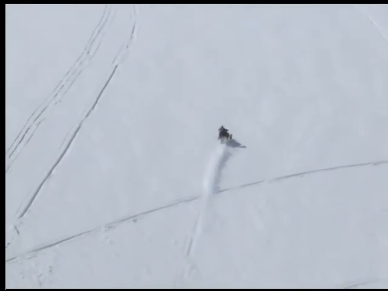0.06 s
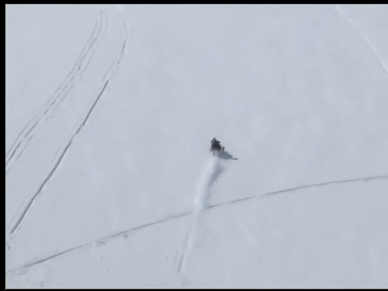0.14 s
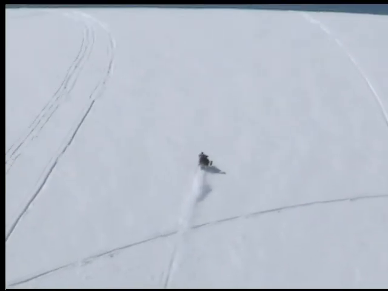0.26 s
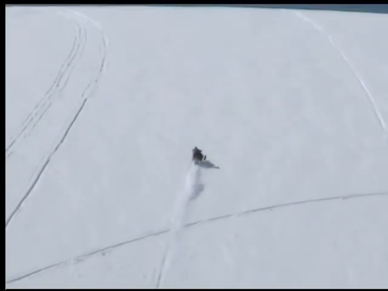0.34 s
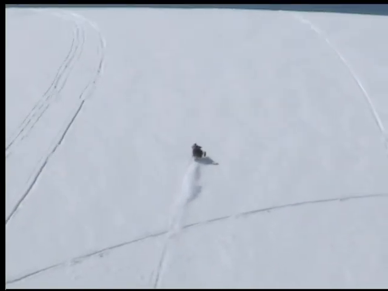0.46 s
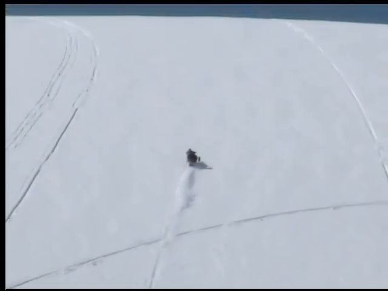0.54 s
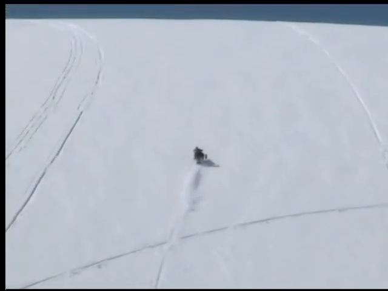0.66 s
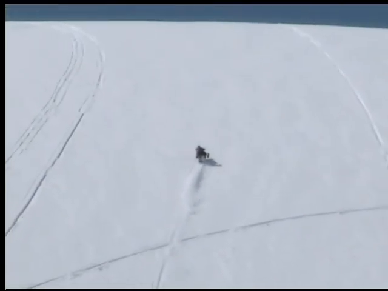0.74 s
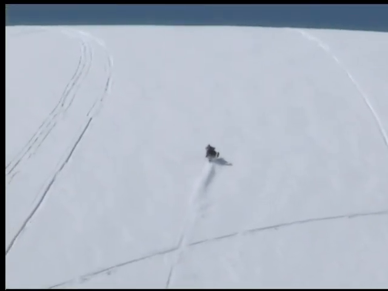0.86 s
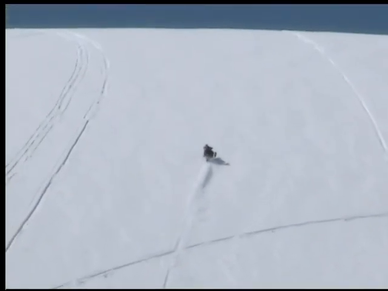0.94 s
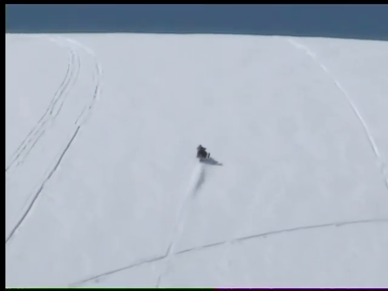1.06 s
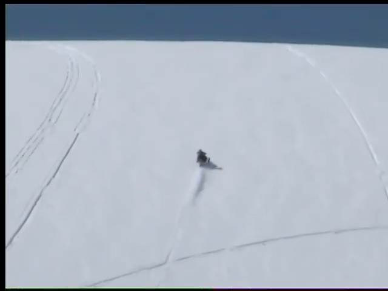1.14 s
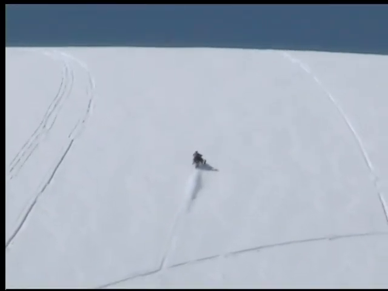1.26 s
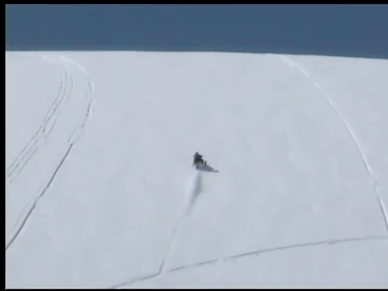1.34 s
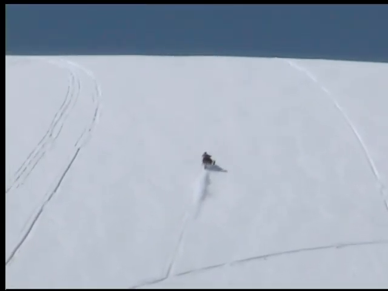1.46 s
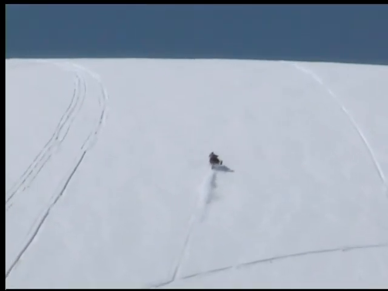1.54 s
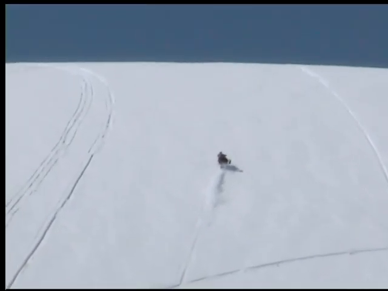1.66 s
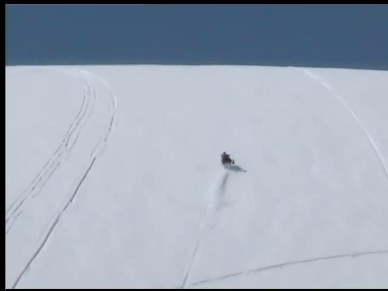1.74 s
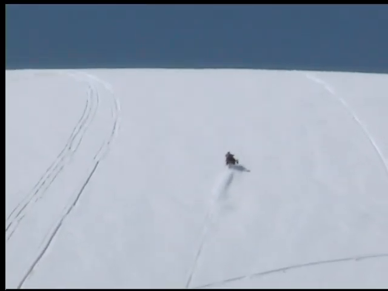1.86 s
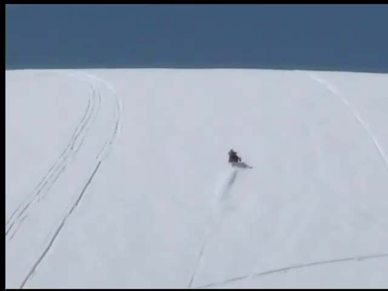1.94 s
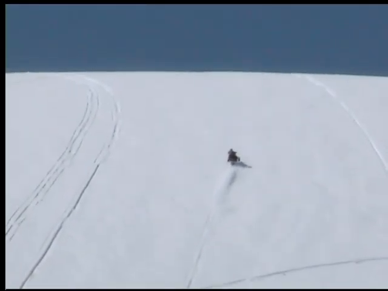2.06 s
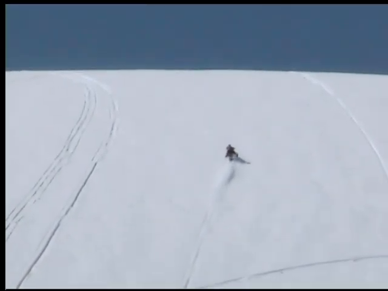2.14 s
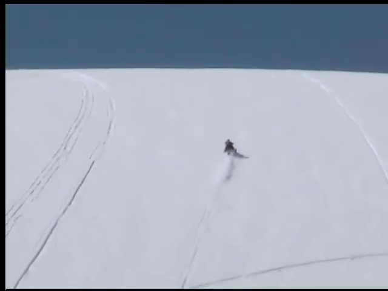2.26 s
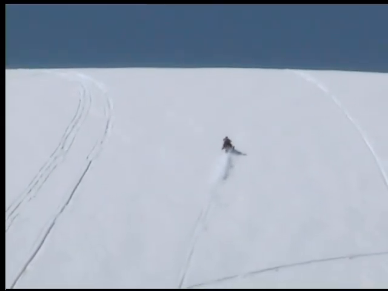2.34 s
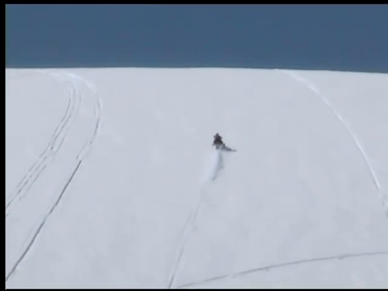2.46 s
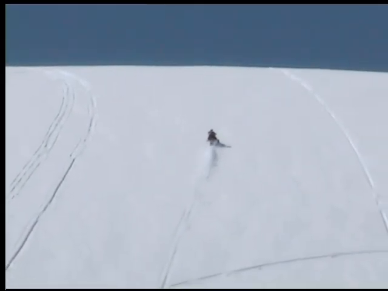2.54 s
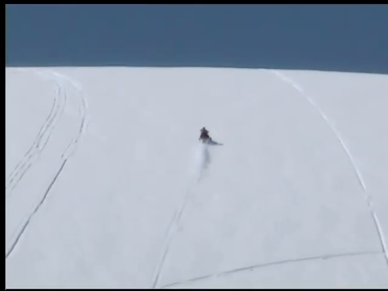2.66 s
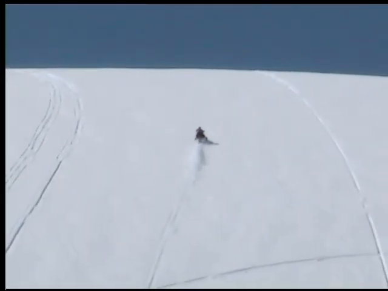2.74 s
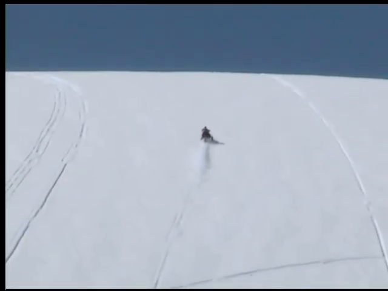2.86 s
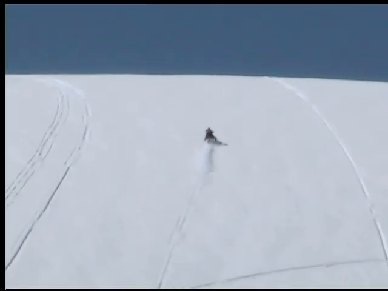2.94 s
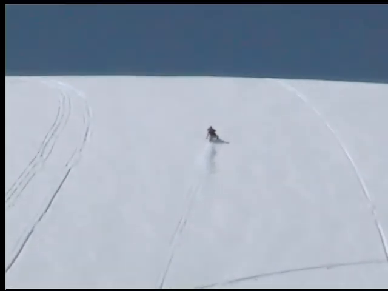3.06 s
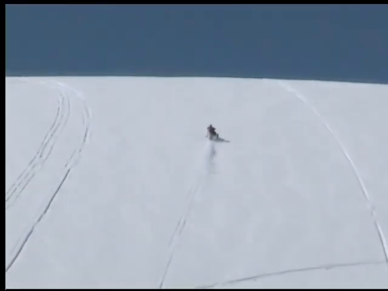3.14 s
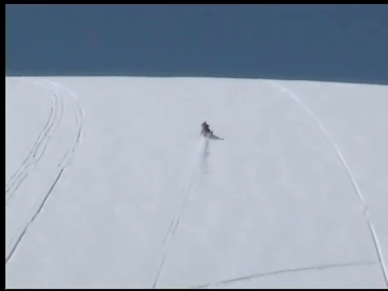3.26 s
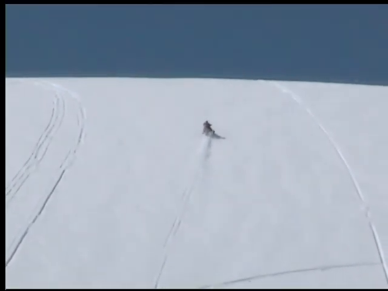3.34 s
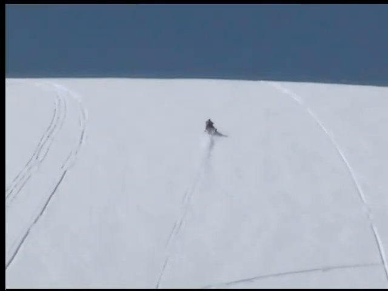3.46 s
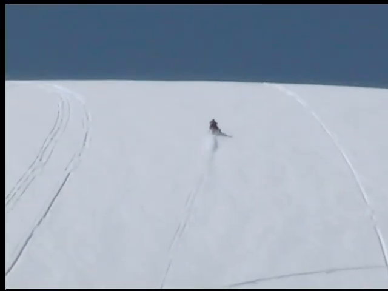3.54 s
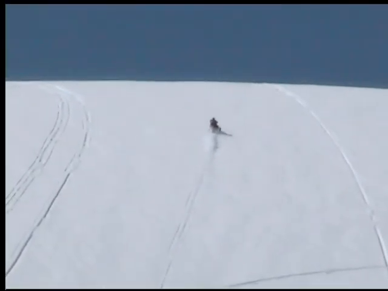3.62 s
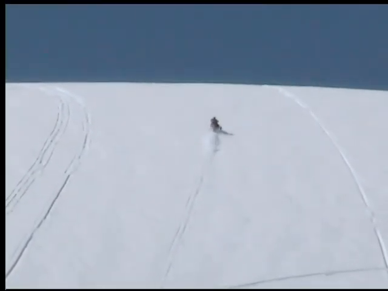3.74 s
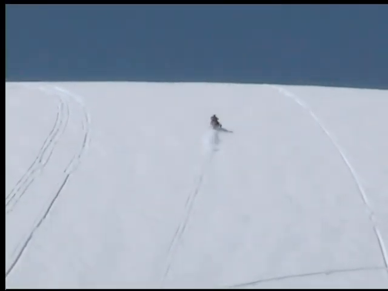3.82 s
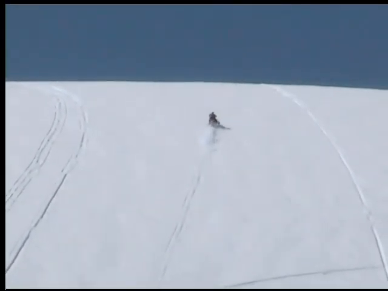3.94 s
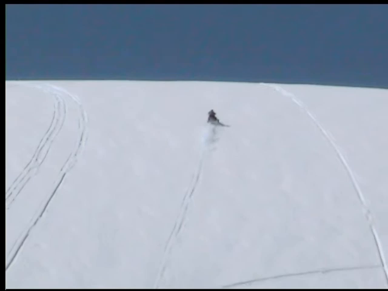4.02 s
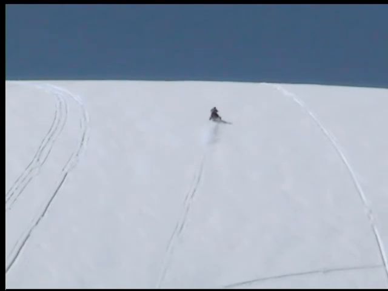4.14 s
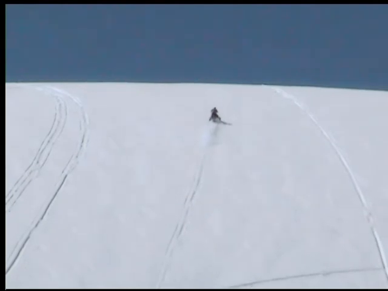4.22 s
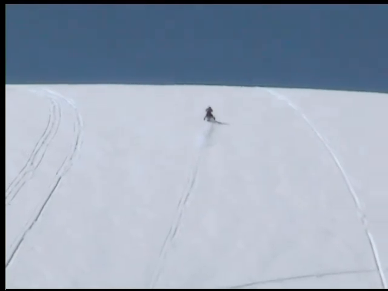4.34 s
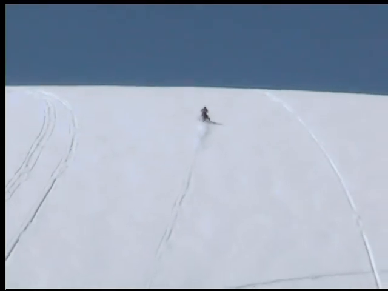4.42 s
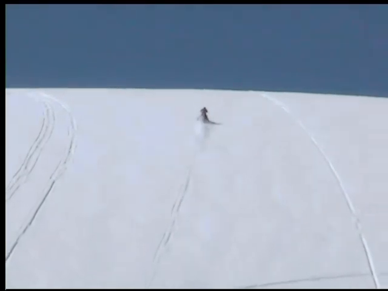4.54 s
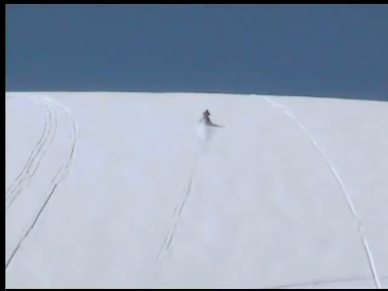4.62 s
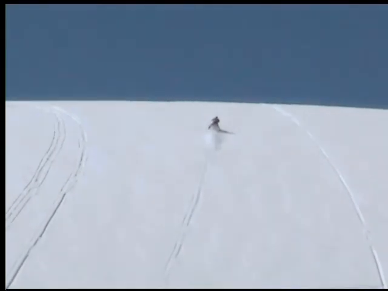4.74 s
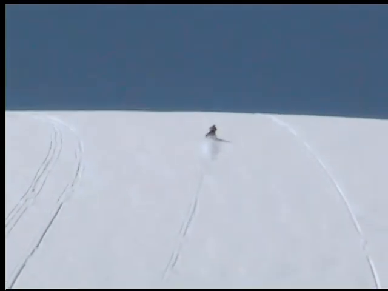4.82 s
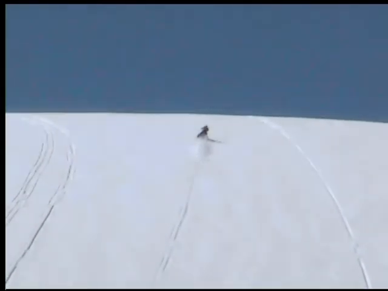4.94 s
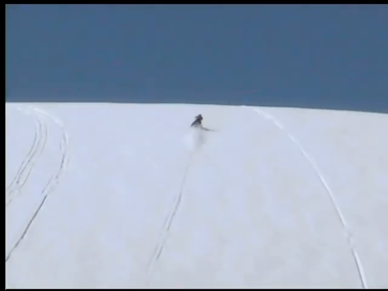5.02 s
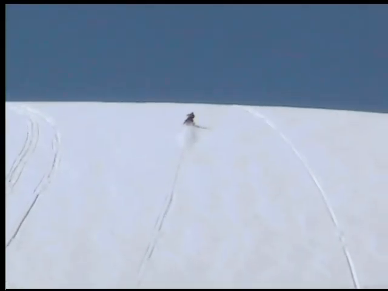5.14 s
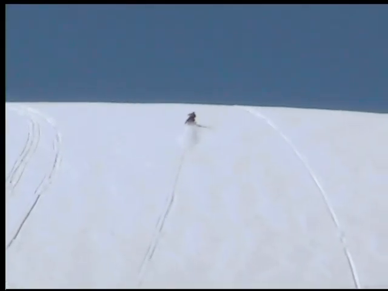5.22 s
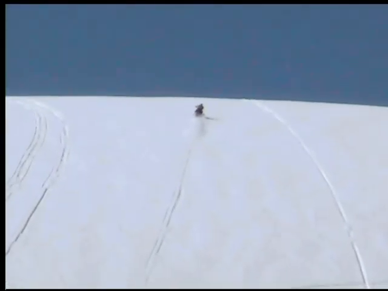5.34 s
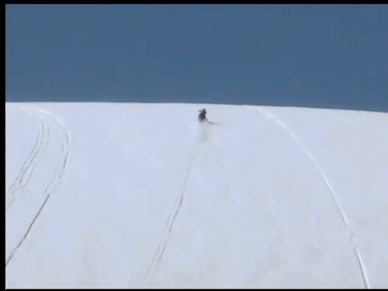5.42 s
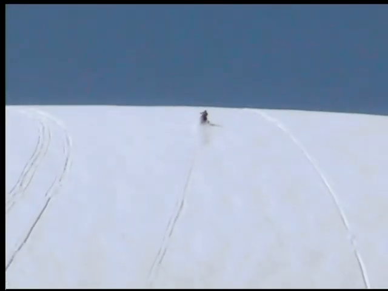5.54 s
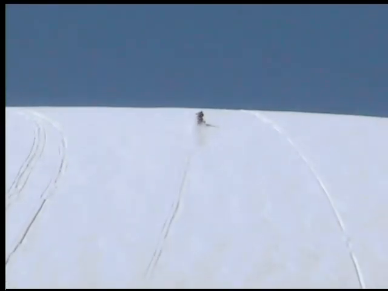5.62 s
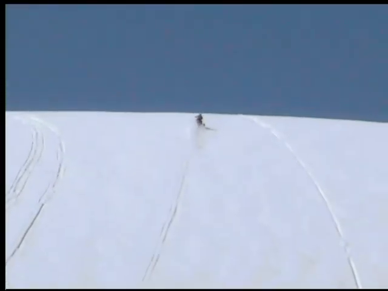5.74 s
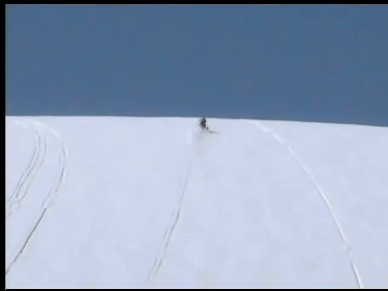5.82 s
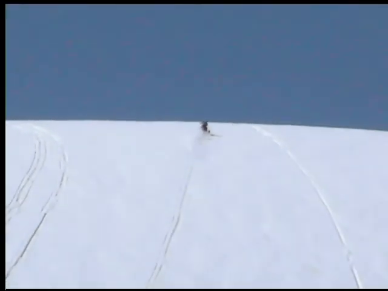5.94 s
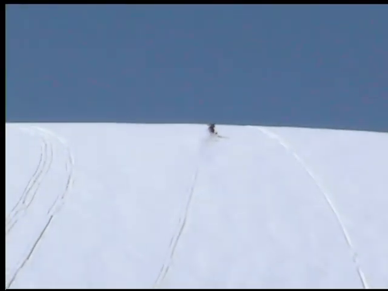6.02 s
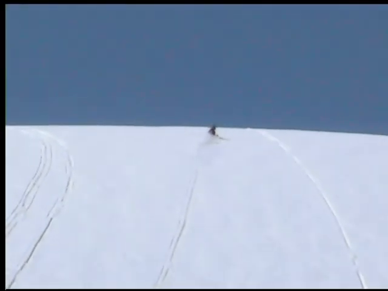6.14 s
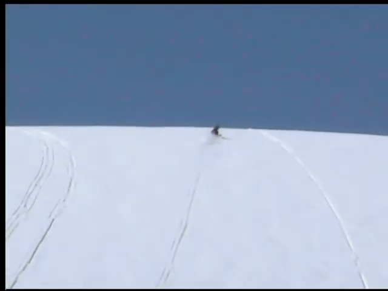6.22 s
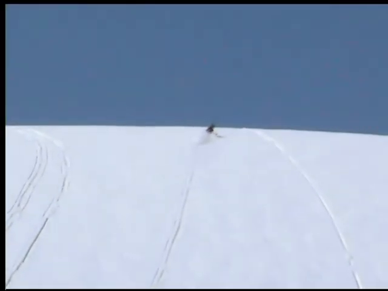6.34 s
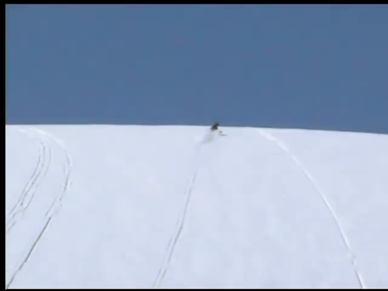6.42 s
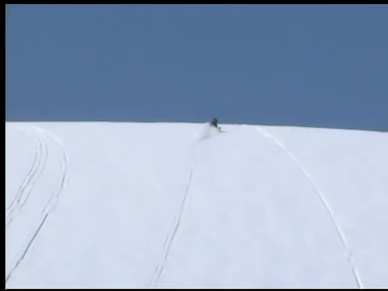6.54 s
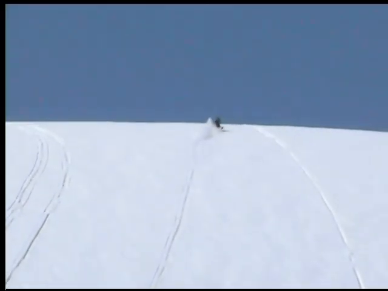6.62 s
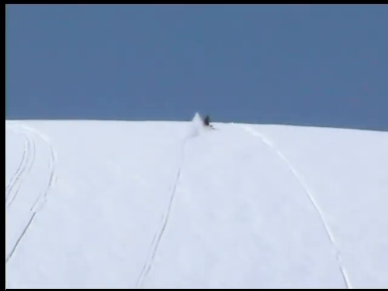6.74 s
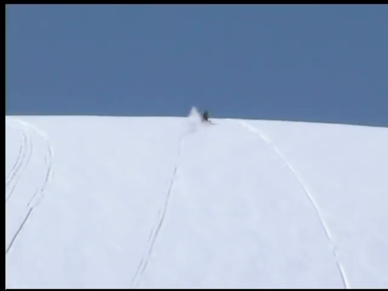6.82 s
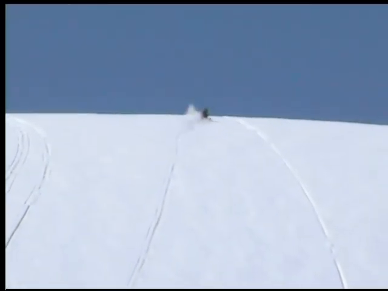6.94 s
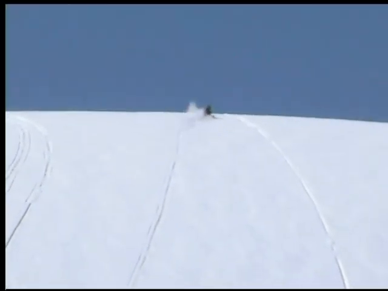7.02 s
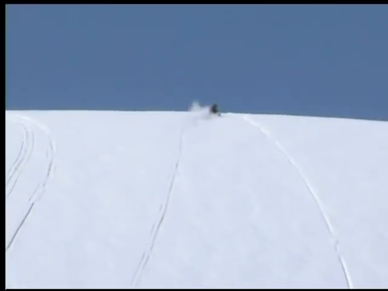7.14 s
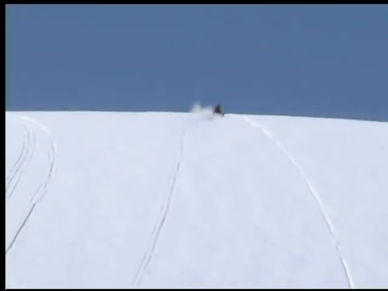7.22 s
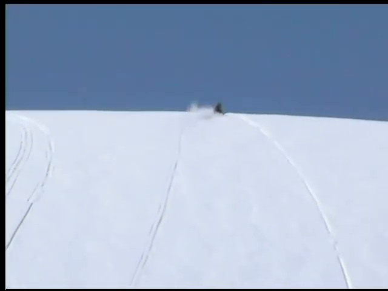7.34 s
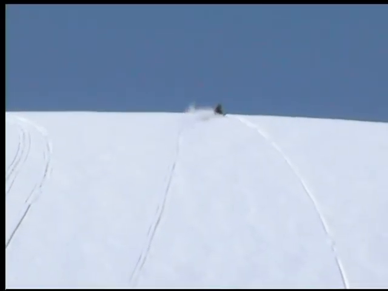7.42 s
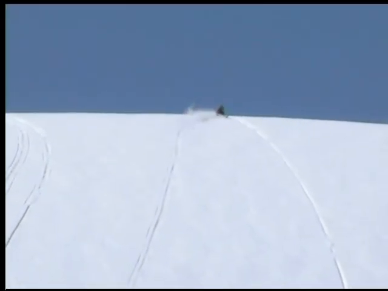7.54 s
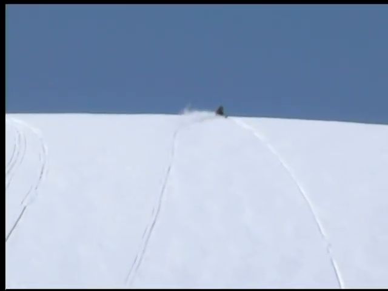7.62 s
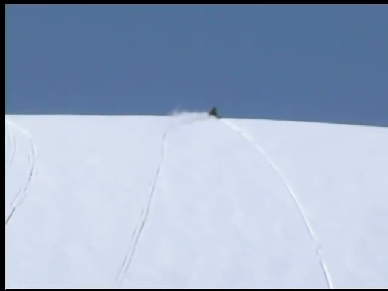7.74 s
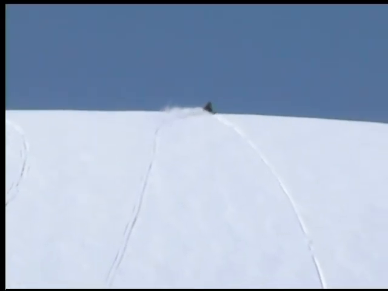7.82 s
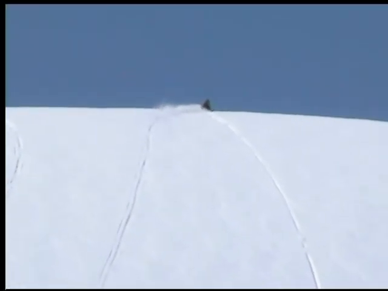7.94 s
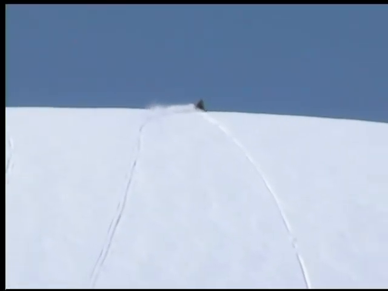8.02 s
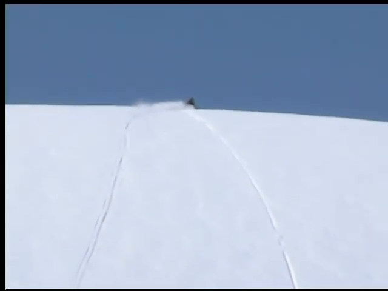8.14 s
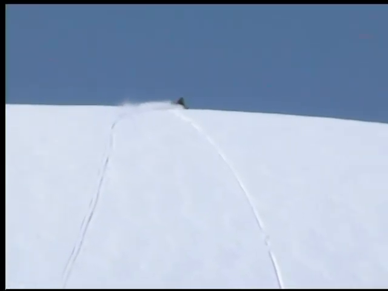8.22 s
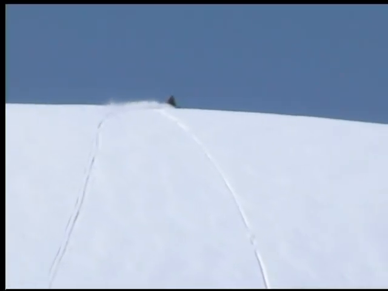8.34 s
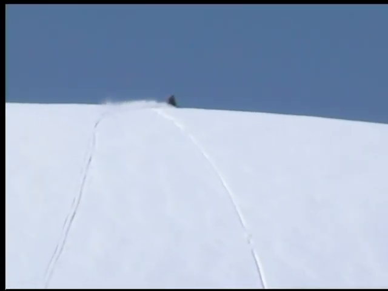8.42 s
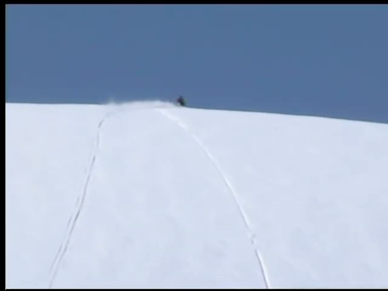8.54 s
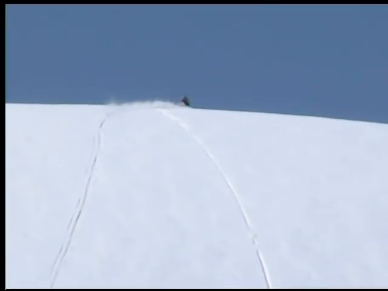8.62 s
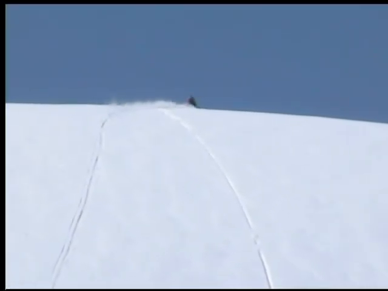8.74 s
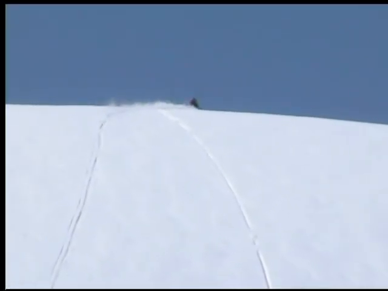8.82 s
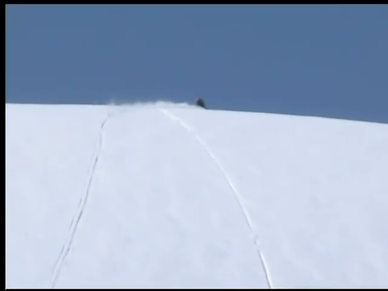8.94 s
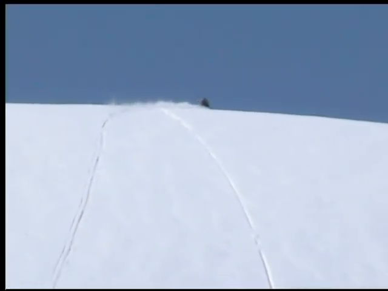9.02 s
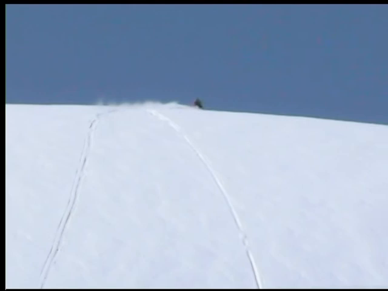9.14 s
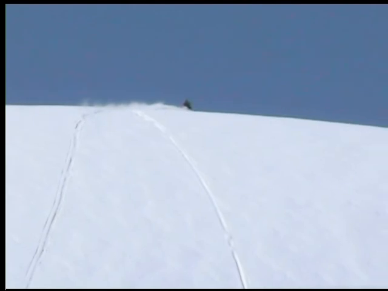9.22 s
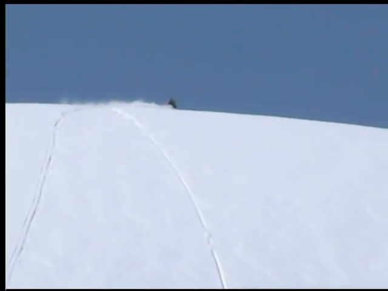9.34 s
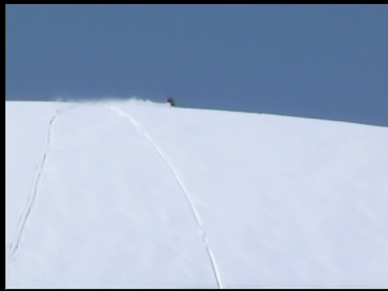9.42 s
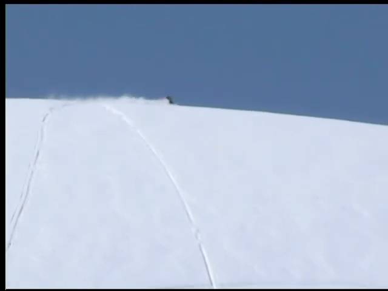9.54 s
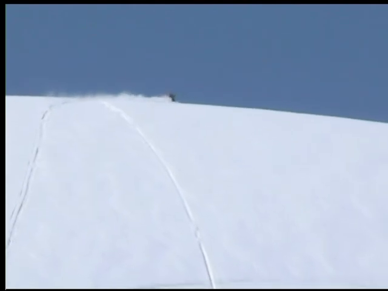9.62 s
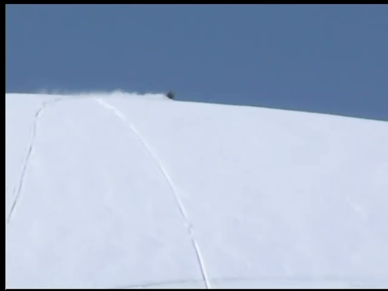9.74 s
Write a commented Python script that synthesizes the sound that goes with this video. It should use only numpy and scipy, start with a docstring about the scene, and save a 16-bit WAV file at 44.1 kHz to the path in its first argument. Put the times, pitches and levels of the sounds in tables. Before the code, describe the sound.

A snowmobile climbs away across an open snowy slope. Its nasal mid-pitched howl wavers quickly as the throttle is worked, with a crackling exhaust rasp and soft churning track beneath. It steadily fades, growing thin and nasal as it turns along the crest. The handheld camera's own motor buzz and hiss stay constant, and a few faint dry clicks sound close to the microphone. Outdoors, almost no echo.

```python
"""A snowmobile climbs away over an open snow slope, its revs swaying as the rider works the throttle.
Harmonics of the firings ring the exhaust, crackling gas puffs once a cycle, and lugs beat and churn the snow.
The hillside adds a faint scattered echo of decaying noise, and a few dry clicks sound close by.
As the machine fades over the crest its rasp turns nasal; the camera's motor buzz and hiss stay on."""
import sys
import numpy as np
from scipy import signal
from scipy.fft import rfft, irfft, next_fast_len
from scipy.io import wavfile
from scipy.ndimage import uniform_filter1d

SR = 44100
rng = np.random.default_rng(int(sys.argv[2]) if len(sys.argv) > 2 else 0)


def transcribe(signal):
    """Save signal, clipped to [-1, 1], as a 16-bit WAV file at the path in sys.argv[1]."""
    frames = np.atleast_2d(signal).T
    limited = np.clip(frames, -1, 1)
    pcm = np.round(limited * 32767).astype(np.int16)
    wavfile.write(sys.argv[1], SR, pcm)


N = 430857  # length in samples

# Engine speed as the rider works the throttle. Each row: time in seconds, firing rate in Hz.
FIRING_RATE = [(0.0, 85.7), (0.12, 85.63), (0.27, 86.86), (0.34, 86.6), (0.405, 89.5), (0.481, 85.12),
               (0.68, 82.2), (0.82, 84.5), (0.958, 85.94), (1.072, 84.3), (1.41, 87.1), (1.63, 84.26),
               (1.82, 87.4), (1.9, 87.93), (2.09, 83.37), (2.31, 85.84), (2.53, 86.74), (2.88, 84.03),
               (3.32, 87.87), (3.59, 83.4), (3.81, 86.26), (4.08, 81.56), (4.22, 80.8), (4.46, 83.04),
               (4.6, 80.7), (4.87, 86.17), (5.01, 83.34), (5.41, 86.6), (5.69, 81.27), (5.77, 81.5),
               (6.01, 85.3), (6.119, 85.5), (6.308, 81.43), (6.558, 87.2), (6.67, 87.1), (6.831, 82.7),
               (6.91, 82.3), (7.07, 86.1), (7.29, 79.7), (7.35, 79.86), (7.59, 88.84), (7.7, 88.4),
               (7.89, 82.9), (8.08, 81), (8.38, 85.2), (8.76, 81.5), (9.17, 85.86), (9.33, 82),
               (9.47, 82.66), (9.58, 87.1), (9.77, 85.4)]
# As the machine turns, the howl's balance tips between its even and odd partials.
# Each row: time in seconds, even minus odd partials in dB.
HOWL_EVEN_ODD = [(0.0, 21.5), (0.219, -8), (0.33, -14), (0.42, -5.5), (0.54, -28), (0.66, -19), (0.85, 2.5),
                 (1.0, 4), (1.22, 7.5), (1.43, -22), (1.62, -1), (1.83, -9.5), (2.12, 3.5), (2.35, -2.5),
                 (3.35, -4), (3.55, -1), (4.65, -1.5), (4.9, -2), (5.35, -4.5), (5.8, 3), (6.05, -2.5),
                 (6.3, 0.5), (6.65, 0), (6.9, -2), (7.1, 1), (8.6, -4.5), (9.77, 0)]
# The drone's own tilt between even and odd partials.
# Each row: time in seconds, even minus odd partials in dB.
DRONE_EVEN_ODD = [(0.0, 10), (0.2, 2), (0.4, -9), (0.6, 1), (0.87, -1.5), (1.3, 6), (2.1, 3), (2.5, -2.5),
                  (2.85, -0.5), (4.2, 2), (6.198, 2), (6.6, -4), (7.302, 0.5), (9.77, -3.5)]
# Exhaust partials in five groups. Each row: multiple of the firing rate, level within its group in dB.
DRONE_PARTIALS = [(4, -2.5), (5, 0.5), (6, -5.5)]
HOWL_PARTIALS = [(7, -0.72), (8, -0.0093)]
SHOULDER_PARTIALS = [(9, 4), (10, -8.5)]
BARK_PARTIALS = [(11, -2.5), (12, -2), (13, -3.5), (14, -9.5), (15, -12.5)]
SNARL_PARTIALS = [(16, 0), (17, 2.5), (18, -6), (19, -1.5), (20, -1), (21, -5), (22, -8), (23, -8)]
# Resonances of pipe and silencer, which delay the partials. Each row: frequency in Hz, width in Hz.
PIPE_RESONANCES = [(200, 420), (505, 33), (560, 81), (640, 164), (850, 54), (900, 65), (1100, 62),
                   (1170, 70), (1250, 120), (1400, 200), (1560, 140), (1680, 230), (1850, 280)]
# The resonance that lifts one or two bark partials drifts as the machine turns.
# Each row: time in seconds, frequency in Hz.
BARK_RESONANCE = [(0.0, 1024), (0.5, 901), (2.4, 920), (3.2, 1020), (4.4, 950.4), (6.0, 1015), (8.9, 1002),
                  (9.77, 1032)]

# The long waves, which sway in level and weaken with distance; trims follow for the drone and the churn.
# Each row: time in seconds, third partial in dB, drone in dB.
LONG_WAVE_LEVELS = [(0.0, -38, -35), (0.46, -37, -34.5), (0.65, -37.5, -40), (0.87, -36.5, -36.5),
                    (1.9, -41, -38.5), (2.97, -39, -41), (3.21, -38.5, -35.5), (4.22, -41, -42.5),
                    (4.87, -41.5, -38), (7.4, -48, -44), (9.44, -55, -53), (9.77, -55, -53.5)]
# The main howl of the pipe, fading with distance. Each row: time in seconds, level before a trim in dB.
HOWL_FADE = [(0.0, -24), (0.46, -25), (0.63, -30), (0.89, -26.5), (1.25, -32), (1.65, -33), (1.87, -29.5),
             (2.2, -31.5), (2.42, -30), (3.08, -31.5), (3.37, -36), (3.5, -30.5), (3.67, -29.5),
             (3.76, -32.5), (4.73, -32.5), (4.79, -35.5), (5.22, -36), (5.39, -32.5), (5.58, -37),
             (5.945, -38), (5.965, -35), (6.12, -33), (6.26, -38), (6.5, -34.5), (6.77, -36), (6.91, -43),
             (6.99, -37), (7.16, -35.5), (7.22, -40), (7.29, -38), (7.41, -39.5), (7.5, -37.5),
             (7.73, -41.5), (7.83, -40), (7.93, -42), (8.19, -42.5), (8.29, -40.5), (8.85, -46),
             (9.02, -45.5), (9.15, -49), (9.77, -47.5)]
# Partials just above the howl, which fade more slowly. Each row: time in seconds, level before a trim in dB.
SHOULDER_FADE = [(0.0, -43), (0.25, -36), (0.55, -34), (0.84, -46.5), (1.05, -50), (1.27, -36), (1.9, -44),
                 (2.1, -42.5), (3.7, -41), (4.25, -47.5), (4.45, -41.5), (4.9, -46.5), (6.7, -44.5),
                 (7.6, -47.5), (8.0, -51), (9.1, -61.5), (9.77, -52)]
# The upper bark comes and goes along the crest. Each row: time in seconds, level before trims in dB.
BARK_FADE = [(0.0, -41), (0.421, -42), (0.52, -37), (0.789, -42.5), (2.12, -47.5), (2.39, -43.5),
             (2.45, -47.5), (3.24, -44), (4.55, -46), (5.14, -53.5), (6.69, -47), (6.94, -59), (6.99, -48),
             (7.26, -53.5), (7.51, -49), (7.75, -60.5), (8.87, -57), (8.9, -53), (9.77, -51.5)]
# The gas rasp between its flares. Each row: time in seconds, level before trims in dB.
RASP_FADE = [(0.0, -51), (0.45, -50), (0.55, -52), (2.0, -53), (3.5, -54.5), (4.4, -56), (5.63, -56.5),
             (7.7, -57), (8.1, -58), (8.75, -60.5), (8.95, -57.5), (9.77, -57.5)]
# The rasp flares in short bursts as the rider blips the throttle.
# Each row: centre in seconds, half length (to 1/e of the rise) in seconds, rise of the noisy gas in dB.
RASP_FLARES = [(0.3, .15, 2), (0.723, 0.02, 3), (0.904, 0.024, 1.5), (1.37, 0.047, 2.5), (2.325, 0.044, 4),
               (3.05, 0.039, 2.5), (3.61, .025, 6), (3.817, 0.026, 5.5), (3.998, 0.038, 4), (4.6, 0.034, 4),
               (5.188, .014, 4), (5.549, 0.04, 1.5), (6.009, 0.056, 3), (6.381, 0.062, 5),
               (6.65, 0.06, 2.5), (7.06, 0.092, 2.5), (7.497, 0.086, 6.5), (8.289, 0.033, 9),
               (8.391, 0.032, 7.5), (8.512, 0.04, 5), (8.945, 0.02, 4), (9.04, .04, 2), (9.411, 0.026, 8),
               (9.655, 0.019, 6)]

# Track partials. Each row: multiple of the lug rate, relative level in dB.
LUG_PARTIALS = [(1, -23.5), (2, -12), (3, -29), (4, -16)]
# The lugs' beat fades on the climb and is hidden by the crest. Each row: time in seconds, gain in dB.
LUG_FADE = [(0.0, -39.5), (2.0, -42.5), (4.0, -40.5), (7.5, -45.5), (8.6, -49.5), (9.77, -49)]

# Noise and buzz spectra. Each row: frequency in Hz, relative level in dB.
CHURN_SPECTRUM = [(40, -23.5), (110, -16), (190, -9.5), (270, -3.5), (380, -5.5), (520, -2.5), (700, 2),
                  (880, -1.5), (1100, -23.5), (1500, -37), (4000, -80)]
GRIT_SPECTRUM = [(200, -51), (650, -30.5), (850, -5.5), (1020, 3.5), (1250, -2), (1600, -31), (5000, -80)]
RASP_SPECTRUM = [(200, -41.5), (800, -11.5), (1250, 3), (1450, 4.5), (1700, -5), (1900, 0.5), (2090, -7.5),
                 (2260, -1.5), (2410, -7.5), (2600, -5.5), (3100, -14.5), (4500, -36.5), (8000, -35.5),
                 (14000, -58)]
NASAL_SPECTRUM = [(700, -51), (1500, -16), (1650, 5), (1780, -10), (1920, -9), (2080, -27.5), (2230, -6.5),
                  (2400, -24.5), (2570, -13), (2850, -27), (3500, -37)]
BUZZ_SPECTRUM = [(150, 5), (800, -4), (1500, 0), (2400, -9.5), (3300, -4.5), (3650, -22), (3900, 3),
                 (4200, 3), (5100, -7), (5900, 0.5), (6300, -2.5), (7200, -25), (8700, -9.5), (14000, -25)]
FIZZ_SPECTRUM = [(3000, -38.5), (7000, -10.5), (10200, -15), (11700, 10), (13300, -4), (14300, -14)]
HISS_SPECTRUM = [(25, 14.5), (150, 20), (600, 4.5), (1800, -13.5), (3200, 6.5), (4500, 6), (5800, 7),
                 (7000, 0.5), (10300, 0.5), (12000, -5), (13300, -10.5), (14300, -26)]

# Thin whines of the camera's gears. Each row: frequency in Hz, rms level in dB.
GEAR_WHINES = [(4049, -82), (5809, -81), (7101, -87)]
# The camera's notch filters against its own motor. Each row: low edge in Hz, high edge in Hz.
MOTOR_NOTCHES = [(1975, 2040), (3510, 3825)]
# Faint dry clicks close to the microphone. Each row: start in seconds, level in dB.
CLICK_TIMES = [(2.2813, -58), (2.3399, -56), (5.0255, -44), (5.4489, -55), (6.7097, -55.5)]
# Modes of the plastic body. Each row: frequency in Hz, level relative to the click in dB.
BODY_MODES = [(3050, -4), (3400, -8), (4100, -8), (10200, -19)]

CRUISE_HZ = 83.8  # firing rate at middling throttle
BELT_TURNS = 0.25  # belt laps per firing
THUD_DB, THUD_FADE_DB_PER_S = -48, 1.49  # firing fundamental at the start, and its loss on the climb
DRONE_DB, DRONE_DB_PER_HZ = -1, 0.28  # trim of the drone, and its swell with the revs
# turning along the crest narrows the broad rasp to a nasal ring
NASAL_FROM_S, NASAL_DB_PER_S, NASAL_HZ = 7.9, 2, 1662
RASP_DB, SNARL_DB = -3, -3.5  # trims of the noisy gas and of the pitched snarl within it
# the puff's delay after the firing and its decay (cycles), and the weaker flow between puffs
PUFF_LAG, PUFF_DECAY, PUFF_FLOOR = 0.24, 0.45, 0.6
CRACKLES_PER_S, CRACKLE_S = 2000, 0.00074  # rate of the gas's tiny spits, and their 1/e decay
# the clutch shifts down on the climb (lugs per firing, and loss of it per second) and smooths the revs
LUGS_PER_FIRING, GEARING_LOSS_PER_S, CLUTCH_S = 1.475, 0.007, 0.21
MOTOR_HZ = 149.99  # turns of the camera's motor per second
TOP_HZ = 14200  # top of the pass band


def engine(hz, boom_db, drone_db):
    """Periodic excitation: slightly uneven firings ring the pipe, each followed by a crackling puff of gas."""
    turns = np.cumsum(hz) / SR
    lows = low_boom(turns, boom_db)
    # each firing burns a little harder or softer
    firing = (turns + 1 / 4).astype(int)
    burn = uniform_filter1d(rng.standard_normal(N // 100)[firing], SR // 500)
    # the load throbs once for each lap of the drive belt
    throb_db = 0.57 * np.sin(2 * np.pi * BELT_TURNS * turns + 0.19 * walk(1.4))
    strength = undb(throb_db + 0.42 * burn)
    turns = turns + 0.002 * walk(100)  # uneven timing
    return lows + strength * (pipe_howl(turns, hz, drone_db) + bark_and_rasp(turns, hz, burn))


def low_boom(turns, boom_db):
    """Lowest harmonics: the firing fundamental and its next two partials carry the long waves."""
    t = np.arange(N) / SR
    thud = partials(turns, [(1, 0)], fade_db=0.2) * undb(THUD_DB - THUD_FADE_DB_PER_S * t)
    boom = partials(turns, [(2, -27.0), (3, -4.0)], fade_db=1.1) * undb(boom_db)
    return thud + boom


def pipe_howl(turns, hz, drone_db):
    """Changing directivity: drone and howl tip between even and odd harmonics as the machine turns."""
    drone_db = drone_db + DRONE_DB + DRONE_DB_PER_HZ * (hz - CRUISE_HZ)
    drone = partials(turns, DRONE_PARTIALS, fade_db=1.12, lean_db=curve(DRONE_EVEN_ODD))
    howl = partials(turns, HOWL_PARTIALS, fade_db=0.25, lean_db=curve(HOWL_EVEN_ODD))
    shoulder = partials(turns, SHOULDER_PARTIALS, fade_db=0.53)
    shoulder_db = curve(SHOULDER_FADE) + 0.5 + 1.8 * walk(5.4)
    return drone * undb(drone_db) + howl * undb(curve(HOWL_FADE) + 0.73) + shoulder * undb(shoulder_db)


def bark_and_rasp(turns, hz, burn):
    """Modulated flow: each puff gates noise beside the high harmonics, and gusts sway bark and rasp together."""
    t = np.arange(N) / SR
    bark_db = curve(BARK_FADE)
    nasal_db = NASAL_DB_PER_S * np.maximum(t - NASAL_FROM_S, 0)
    flare_db = sum(db * np.exp(-((t - s) / length) ** 2) for s, length, db in RASP_FLARES)
    gusts = walk(18)  # along the path

    bark = partials(turns + 0.0022 * walk(70), BARK_PARTIALS, fade_db=1.03,
                    lean_db=0.32 * curve(HOWL_EVEN_ODD), ring_order=curve(BARK_RESONANCE) / hz, ring_db=5.5)
    bark = bark * undb(bark_db - 2.1 + 1.0 * gusts + 0.16 * flare_db)
    snarl = partials(turns + 0.0043 * walk(90), SNARL_PARTIALS, fade_db=1.5,
                     ring_order=NASAL_HZ / hz, ring_db=1.81 * nasal_db)

    puffs = PUFF_FLOOR + np.exp(-((turns - PUFF_LAG) % 1) / PUFF_DECAY)
    grit = noise(GRIT_SPECTRUM, puffs) * undb(bark_db - 8.0)
    spits = puffs * crackle()
    broad_gas = noise(RASP_SPECTRUM, spits) * undb(-nasal_db)
    nasal_gas = noise(NASAL_SPECTRUM, spits) * undb(-5.5 + nasal_db)
    gas = (broad_gas + nasal_gas) * undb(RASP_DB + flare_db)
    rasp = gas + snarl * undb(SNARL_DB + 0.4 * flare_db)
    return bark + grit + rasp * undb(curve(RASP_FADE) + 0.74 * gusts + 1.0 * burn)


def partials(turns, orders, fade_db, lean_db=0, ring_order=0, ring_db=0):
    """Resonance and scattering: the pipe lags each harmonic; moving air fades the higher ones more. Rms near 1."""
    mean_hz = np.mean(np.array(FIRING_RATE)[:, 1])
    out, power = 0, 0
    for order, db in orders:
        k = round(order)
        hz = k * mean_hz
        # phase lag summed over the resonances
        lag = sum(np.arctan((hz / f - f / hz) * f / width) for f, width in PIPE_RESONANCES)
        lift_db = lean_db * (k % 2 == 0) + ring_db * np.exp(-(k - ring_order) ** 2)
        gain = undb(db + lift_db + fade_db * np.sqrt(k) * walk(5))
        out = out - gain * np.cos(2 * np.pi * k * turns - lag)
        power = power + gain ** 2 / 2
    return out / np.sqrt(power)


def crackle(scatter_db=0.5):
    """Shot noise: gas flow is a dense random run of short decaying spits of uneven size. Rms 1."""
    size = undb(scatter_db * np.clip(rng.standard_normal(N), -2, 2))
    spits = (rng.random(N) < CRACKLES_PER_S / SR) * size
    fall = np.exp(-np.arange(SR // 100) / SR / CRACKLE_S)
    power = signal.fftconvolve(spits ** 2, fall ** 2)[:N]  # overlapping spits add in power
    return level(np.sqrt(np.abs(power)))


def track(hz, churn_db):
    """Periodic impact: lugs, driven by the engine through the clutch, beat on the snow and churn it up."""
    t = np.arange(N) / SR
    gearing = LUGS_PER_FIRING - GEARING_LOSS_PER_S * t
    lug_hz = gearing * uniform_filter1d(hz, int(CLUTCH_S * SR)) * (1 + 0.006 * walk(6))
    turns = np.cumsum(lug_hz) / SR
    lugs = 0
    for k, db in LUG_PARTIALS:
        gain = undb(db + 3.4 * walk(3.05)) * np.sqrt(2)
        lugs = lugs + gain * np.cos(2 * np.pi * (round(k) * turns + rng.random()))
    churn = noise(CHURN_SPECTRUM) * undb(churn_db - 3.0 + 0.5 * walk(21))
    return lugs * undb(curve(LUG_FADE)) + churn


def hillside(x, t60=0.81, echo_db=-21):
    """Diffuse reflection: soft snow sends back only a thin, scattered echo, from 40 ms onward."""
    t = np.arange(SR) / SR
    tail = rng.standard_normal(SR) * undb(-60 * t / t60) * (t > 0.04)
    return signal.fftconvolve(x, level(tail, echo_db) / np.sqrt(SR))[:N]


def clicks(t60=0.006, crack_db=-12.0):
    """Impulse response: each short dry tick is a crack and a brief ring of the plastic body's modes."""
    t = np.arange(SR // 50) / SR
    ring = sum(undb(db) * np.sin(2 * np.pi * hz * t) for hz, db in BODY_MODES)
    crack = rng.standard_normal(len(t)) * undb(crack_db)
    taps = np.zeros(N)
    for s, db in CLICK_TIMES:
        taps[int(s * SR)] = undb(db)
    return signal.fftconvolve(taps, (ring + crack) * undb(-60 * t / t60))[:N]


def camera():
    """Rotating machinery: the camera's motor ticks and scrapes twice a turn, over the microphone's hiss."""
    t = np.arange(N) / SR
    half_turns, phase = np.divmod(2 * MOTOR_HZ * t, 1)
    unevenness = 1 + 0.087 * (-1) ** half_turns  # alternate ticks differ
    ticks = np.diff(half_turns, prepend=0) * unevenness * undb(0.66 * walk(300))
    buzz = level(colour(ticks, BUZZ_SPECTRUM), -59.0)
    fizz = noise(FIZZ_SPECTRUM, 0.3 + np.exp(-phase / 0.15)) * undb(-78)
    whine = sum(level(np.sin(2 * np.pi * hz * t + 1.2 * walk(20)), db) for hz, db in GEAR_WHINES)
    shared_hiss = noise(HISS_SPECTRUM) * undb(-67)
    # independent in each channel
    port_hiss = np.array([noise(HISS_SPECTRUM), noise(HISS_SPECTRUM)]) * undb(-63.0)
    return buzz + fizz + whine + shared_hiss + port_hiss


def undb(db):
    """Decibel law: the amplitude gain of a level in dB."""
    return 10 ** (np.asarray(db) / 20)


def level(x, db=0):
    """Root mean square: the sound scaled to an rms level in dB."""
    return x * undb(db) / np.sqrt(np.mean(x ** 2))


def curves(table):
    """Linear interpolation: each column of a timed table, sample by sample."""
    s, *columns = np.transpose(table)
    return [np.interp(np.arange(N) / SR, s, c) for c in columns]


def curve(table):
    """Linear interpolation of a table with a single timed column."""
    return curves(table)[0]


def walk(rate):
    """Slow random modulation: levels held 1 / rate seconds and smoothed twice over that time. Rms 1."""
    k = max(int(SR / rate), 1)
    held = np.repeat(rng.standard_normal(N // k + 1), k)[:N]
    return level(uniform_filter1d(uniform_filter1d(held, k), k))


def colour(x, points):
    """Minimum phase: a causal filter with the given (Hz, dB) outline, by folding its cepstrum."""
    size = next_fast_len(N + SR // 4, real=True) // 2 * 2
    hz, db = np.transpose(points)
    bins = np.maximum(np.fft.rfftfreq(size, 1 / SR), 1)
    outline_db = np.interp(np.log(bins), np.log(hz), db)
    cepstrum = irfft(np.log(undb(outline_db)))
    cepstrum[1:size // 2] *= 2
    cepstrum[size // 2 + 1:] = 0
    return irfft(rfft(x, size) * np.exp(rfft(cepstrum)))[:N]


def noise(points, gate=1):
    """Filtered random pressure: gated white noise shaped to a spectrum. Rms 1."""
    return level(colour(gate * rng.standard_normal(N), points))


def delay(x, samples):
    """Linear phase: the sound made later by any part of a sample."""
    size = 2 * next_fast_len(N // 2 + SR // 10)
    phase = 2 * np.pi * np.fft.rfftfreq(size) * samples
    return irfft(rfft(x, size) * np.exp(-1j * phase))[:N]


def scene():
    """Superposition: the distant machine is a point straight ahead; bumps in the snow make its revs waver."""
    hz = uniform_filter1d(curve(FIRING_RATE), SR // 25) * (1 + 0.001487 * walk(14))
    boom_db, drone_db = curves(LONG_WAVE_LEVELS)
    sled = engine(hz, boom_db, drone_db) + track(hz, boom_db)
    return sled + hillside(sled) + camera() + clicks()


def record(dry):
    """Band limiting: left is a touch later and louder; two narrow bands are notched out and the top is cut."""
    pair = np.array([delay(dry[0], samples=0.72) * undb(0.16), dry[1]])
    for edges in MOTOR_NOTCHES:
        notch = signal.butter(3, edges, "bandstop", fs=SR, output="sos")
        pair = signal.sosfilt(notch, pair)
    top_cut = signal.ellip(10, 0.2, 70, TOP_HZ, fs=SR, output="sos")
    return signal.sosfilt(top_cut, pair)


dry = scene()
out = record(dry)
transcribe(out)
```